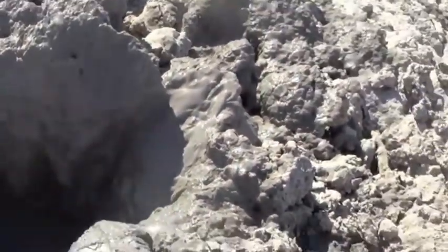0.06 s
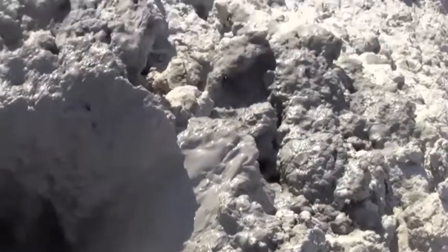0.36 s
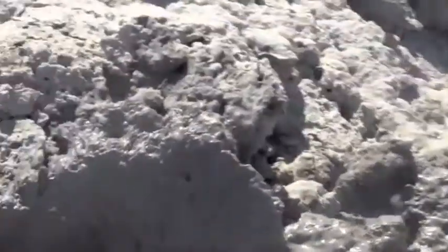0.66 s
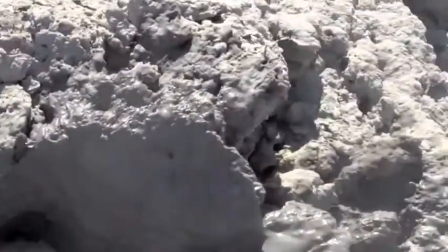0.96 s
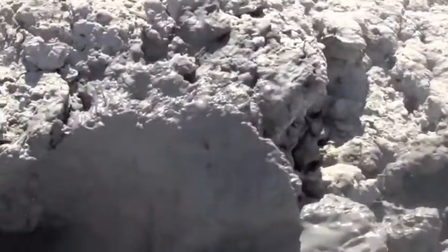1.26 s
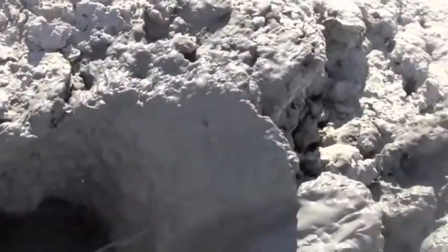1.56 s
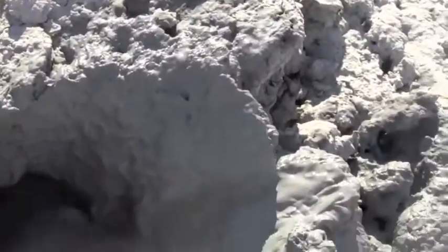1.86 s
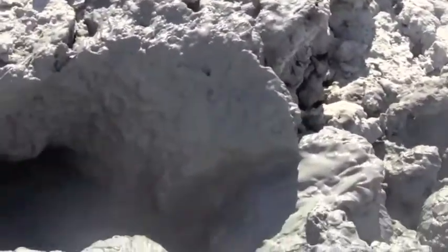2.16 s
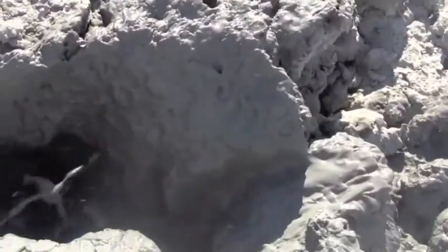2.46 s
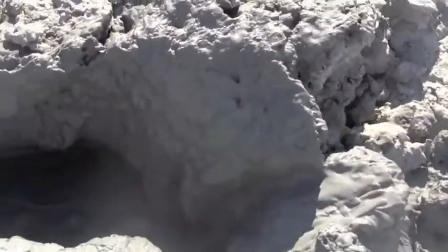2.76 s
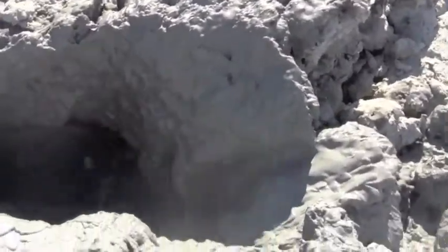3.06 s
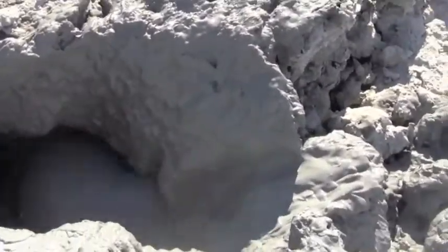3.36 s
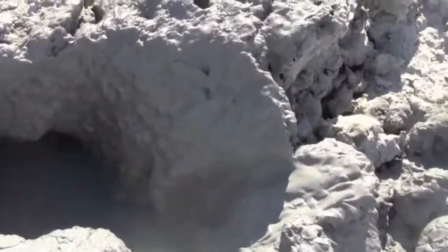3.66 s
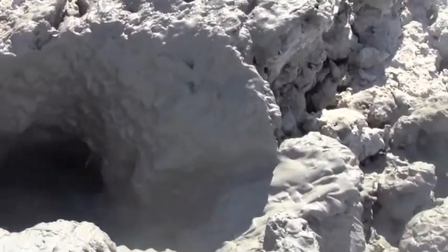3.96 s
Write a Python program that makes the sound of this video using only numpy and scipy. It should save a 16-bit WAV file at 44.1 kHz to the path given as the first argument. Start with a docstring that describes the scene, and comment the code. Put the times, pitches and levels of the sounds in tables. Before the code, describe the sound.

Mud bubbles pop and splatter in uneven bursts with short lulls, close to the microphone at the edge of an open-air vent. Soft churning, dull gulps and brief sputters of gas run between them, with very light wind behind.

```python
"""Boiling mud crater.

Thick mud boils outdoors, heard from the rim. Gas bubbles break in irregular bursts: each cavity rings
briefly and rises in pitch as it opens, its skin tears with a wet splat, and escaping gas sprays fine
droplets. Deeper down the mud gulps and churns. The walls add a very short ring; light wind hisses."""
import sys
import numpy as np
from scipy import signal
from scipy.fft import rfft, irfft
from scipy.io import wavfile

SR = 44100
rng = np.random.default_rng(int(sys.argv[2]) if len(sys.argv) > 2 else 0)


def bounce(signal):
    """Save signal as a 16-bit WAV file at the path given by the first command-line argument."""
    frames = np.transpose(np.atleast_2d(signal))
    limited = np.clip(frames, -1, 1)
    pcm = np.round(limited * 32767).astype(np.int16)
    wavfile.write(sys.argv[1], SR, pcm)


N = 176400


def undb(db):
    """Decibels to gain."""
    return 10 ** (np.asarray(db) / 20)


def unit(x):
    """Scale to rms 1."""
    return x / np.sqrt(np.mean(x ** 2))


def add(out, start_s, x):
    """Mix x into out at start_s."""
    i = max(int(start_s * SR), 0)
    out[i:i + len(x)] += x[:max(len(out) - i, 0)]


def curve(rows):
    """Gain over time from (time [s], level [dB]) rows."""
    return undb(np.interp(np.arange(N) / SR, *np.array(rows).T))


def at_hz(rows, hz):
    """Interpolate (frequency [Hz], value) rows on a log axis."""
    row_hz, values = np.array(rows).T
    return np.interp(np.log(hz + 1), np.log(row_hz), values)


def colour(x, rows, share=1):
    """Filter by (frequency [Hz], gain [dB]) rows; share scales the dB."""
    gain_db = share * at_hz(rows, np.fft.rfftfreq(len(x), 1 / SR))
    return irfft(rfft(x) * undb(gain_db), len(x))


def band(x, lo_hz, hi_hz):
    """Band-pass; rms 1."""
    sos = signal.butter(2, [lo_hz, hi_hz], "band", fs=SR, output="sos")
    return unit(signal.sosfilt(sos, x))


def walk(rate_hz, size=N):
    """Smooth random drift; spread near 1."""
    position = np.arange(size) / SR * rate_hz
    knots = int(position[-1]) + 2
    return np.interp(position, np.arange(knots), rng.standard_normal(knots))


def cavity(hz, decay_s, rise_per_s, wobble=0, size=SR // 6):
    """A gas pocket swells, rings with rising pitch and collapses; peak near 1."""
    open_decays, collapse_decays, overtone_db = 0.26, 14, -22
    t = np.arange(size) / SR
    age = t / decay_s
    env = (1 - np.exp(-age / open_decays)) * np.exp(-age - (age / collapse_decays) ** 4)
    env /= env.max()
    phase = 2 * np.pi * np.cumsum(hz * (1 + rise_per_s * t) * (1 + wobble)) / SR
    return env * (np.sin(phase) + undb(overtone_db) * env * np.sin(2 * phase))


def droplets(spread_db, per_s=2600, decay_cycles=2.5, pool=12000):
    """Dense crackle of tiny bursting pockets; rms 1."""
    out, t = np.zeros(N), np.arange(SR // 200) / SR
    for when, pitch, size in rng.random((pool, 3))[:int(per_s * N / SR)]:
        hz = 1000 * 14 ** pitch
        strength = undb(-spread_db * np.log(max(size, .02))) * np.sqrt(hz)
        env = np.exp(-t * hz / decay_cycles) * (1 - t / t[-1])
        add(out, when * N / SR, strength * env * np.sin(2 * np.pi * hz * t))
    return unit(out)


# Wind spectrum (frequency [Hz], relative density [dB])
WIND_SPECTRUM = [(30, -16), (112, -12), (410, 3), (1150, -6), (2850, -11), (11000, -21), (15000, -32)]
# Wind strength (time [s], level [dB])
WIND_LEVEL = [(0, -43), (.5, -51.5), (2.6, -46), (4, -53)]


def wind(gust_db=1.0, gust_hz=6.4):
    """Light air over open ground."""
    hiss = unit(colour(rng.standard_normal(N), WIND_SPECTRUM))
    return hiss * curve(WIND_LEVEL) * undb(gust_db * walk(gust_hz))


# Pocket strength (pitch [Hz], relative level [dB])
CHURN_SPECTRUM = [(70, -8), (130, 2.5), (200, 3), (400, -1.5), (800, -6.5), (2400, -12.5)]
# Churn strength (time [s], level [dB])
CHURN_LEVEL = [(0, -52), (.42, -49.5), (.68, -43.5), (.85, -56), (.95, -35.5), (1.12, -46), (1.52, -37),
               (1.95, -40), (2.3, -37.5), (2.58, -56), (2.74, -45), (2.82, -47.5), (2.98, -37.5),
               (3.27, -41.5), (3.72, -40), (3.92, -29.5), (4, -35)]


def churn(per_s=330, spread_db=4.0, max_rise_per_s=18, pool=2500):
    """Many small soft pockets turn over inside the vent."""
    out = np.zeros(N)
    for when, pitch, size, length in rng.random((pool, 4))[:int(per_s * N / SR)]:
        hz = 90 * 32 ** pitch
        decay_s = 1.4 * (0.82 + length) / np.sqrt(hz * 400)
        db = at_hz(CHURN_SPECTRUM, hz) - spread_db * np.log(max(size, .04))
        ring = cavity(hz, decay_s, max_rise_per_s * length, size=SR // 16)
        add(out, when * N / SR, undb(db) * ring)
    return unit(out) * curve(CHURN_LEVEL)


def specks(per_s=22, decay_s=0.0029, pool=400):
    """Specks of mud tick on the crater walls, harder when the vent churns."""
    env, t = np.zeros(N), np.arange(SR // 100) / SR
    for when, size in rng.random((pool, 2))[:int(per_s * N / SR)]:
        add(env, when * N / SR, size ** 2 * np.exp(-t / decay_s))
    grit = colour(band(rng.standard_normal(N), 920, 14000), [(1500, 16.5), (10000, -5)])
    return curve(CHURN_LEVEL) * env * grit


# Skin tears (time [s], low band [dB], mid band [dB], high band [dB], decay [ms])
SKIN_TEARS = [(0.019, -22, -32, -31, 2.35), (0.542, -22, -36, -33, 5.8), (.565, -14.5, -37, -23.5, 3.8),
              (.675, -38, -28, -31, 2.7), (0.803, -26.5, -27.5, -29.5, 5), (0.824, -14, -12.5, -17.5, 2.2),
              (0.973, -48, -35, -30.5, 1.2), (1.188, -24.5, -23.5, -26.5, 5.4),
              (1.251, -19.5, -25.5, -22, 5.3), (1.264, -17.5, -19.5, -18.5, 2.8),
              (1.315, -52, -19, -13, 0.56), (1.335, -20, -31, -28.5, 5.4), (1.415, -28.5, -30, -33.5, 3.3),
              (1.489, -40, -19, -26, 10.2), (1.525, -17.5, -21, -25, 5.5), (1.647, -25.5, -24.5, -20, 3.6),
              (1.729, -23.5, -24.5, -25, 3.2), (2.141, -30.5, -34, -33.5, 9.3),
              (2.191, -22, -37, -37.5, 4.3), (2.285, -19, -23.5, -29, 8.9), (2.35, -19, -21.5, -24.5, 5.5),
              (2.408, -24.5, -29, -46, 0.76), (2.472, -17, -15, -19.5, 4.6), (2.555, -24.5, -44, -42, 1.4),
              (2.715, -34, -36.5, -42, 7.8), (3.005, -31, -16, -22.5, 6.9), (3.119, -33.5, -31.5, -25, 3.1),
              (3.175, -27.5, -23, -27.5, 3.7), (3.620, -30, -40, -45, 2.2), (3.786, -34, -34.5, -27, 1.2),
              (3.884, -25.5, -39, -38, 18), (3.913, -15.5, -17.5, -25, 7), (3.976, -22, -41, -38.5, 9.6)]


def splats(attack_ms=1.4, lead_s=.02, stretch_db=-18.5):
    """Mud skin crackles faintly as it stretches, then tears with a sharp burst in three bands."""
    out, t = np.zeros(N), np.arange(SR // 10) / SR
    crackle = droplets(spread_db=2.5) + undb(6.5) * rng.standard_normal(N)
    bands = np.array([band(crackle, *hz) for hz in [(557, 2280), (2610, 5000), (6360, 12060)]])
    for start_s, *bands_db, decay_ms in SKIN_TEARS:
        tear = (1 - np.exp(-(t / attack_ms * 1000) ** 2)) * np.exp(-t / decay_ms * 1000)
        stretch = undb(stretch_db) * tear.max() * np.exp(-np.abs(t - lead_s) / decay_ms * 1000)
        env = np.hypot(np.interp(t - lead_s, t, tear), stretch)
        grit = bands.take(int(start_s * SR) + np.arange(len(t)), axis=1, mode="wrap") * env
        # Each band gets the energy of the envelope at peak 1.
        grit *= np.sqrt(np.sum(env ** 2) / np.sum(grit ** 2, axis=1, keepdims=True)) / env.max()
        add(out, start_s - lead_s, undb(bands_db) @ grit)
    return out


# Pockets bursting at once (time [s], start pitch [Hz], level [dB])
BLUNT_POPS = [(.020, 288, -19), (.020, 774, -16.5), (.186, 3070, -35.5), (0.526, 1840, -14.5),
              (0.564, 385, -9.5), (.805, 1350, -15.5), (0.822, 1204, -13.5), (0.976, 1570, -27),
              (.824, 395, -13), (.824, 570, -9), (1.194, 2810, -16.5), (1.266, 460, -16),
              (1.337, 1100, -12), (1.583, 870, -17), (1.729, 620, -18), (2.350, 830, -8.5),
              (2.359, 1950, -16.5), (3.006, 698, -5.5), (3.007, 1990, -13.5), (3.192, 1190, -24),
              (3.519, 1706, -23.5), (3.886, 454, -14.5), (3.912, 616, -4.5), (3.931, 387, -10.5)]
# Necks of gas closing quickly (time [s], start pitch [Hz], level [dB])
WET_SQUELCHES = [(.132, 630, -33), (1.183, 465, -24.5), (1.240, 1140, -26), (1.681, 443, -25),
                 (1.691, 758, -22.5), (1.702, 1400, -31), (1.709, 1745, -22.5), (1.711, 1040, -28),
                 (1.746, 985, -29.5), (1.756, 1400, -26.5), (2.965, 1348, -18), (2.986, 1870, -27),
                 (3.052, 803, -29), (3.142, 1104, -35), (3.167, 1464, -32.5), (3.193, 2050, -26.5),
                 (3.206, 1030, -23.5), (3.968, 1340, -19.5)]
# Cavities opening (time [s], start pitch [Hz], level [dB], decay [ms], rise [start pitches/s])
PLOPS = [(.253, 192, -32, 13.4, 27), (.514, 1533, -25, 11, 9.3), (.566, 1513, -10.5, 5.2, 16.4),
         (.566, 662, -11, 6, 13), (.824, 1790, -22, 9.3, 5.5), (1.020, 212.6, -28.5, 16.3, 17.8),
         (1.025, 1333, -29.5, 26, 6.1), (1.226, 495, -10.5, 4.1, 4.9), (1.233, 650, -15.5, 9.8, 26),
         (1.262, 739, -11.5, 8.7, 9.3), (1.315, 1160, -19, 9, 7.5), (1.341, 820, -14, 7.8, 13.3),
         (1.340, 1595, -15, 8.2, 1.1), (1.529, 566, -7, 3.9, 28), (1.549, 470, -14.5, 4.6, 52),
         (1.729, 2516, -31, 8, 1.5), (2.128, 379, -10.5, 8, 14.7), (2.196, 890, -28, 11, 8),
         (2.347, 340, -14, 5.4, 5.2), (2.360, 913, -13, 5, 3.3), (2.364, 1540, -24, 12, 0.93),
         (2.424, 185, -24.5, 13.4, 42), (2.471, 1726, -14, 5.6, 7.1), (2.473, 667, -16, 8.1, 11),
         (2.476, 2350, -16.5, 4, 1.7), (2.491, 335, -25.5, 10.3, 15.7), (3.004, 296, -15.5, 12, 1.55),
         (3.005, 1295, -15, 5, 7.1), (3.795, 394, -24, 13, 13), (3.847, 990, -20, 3.6, 15),
         (3.868, 637, -20.5, 10.5, 3.3), (3.920, 1780, -15.5, 4.9, 11.4), (3.990, 387, -21, 7, 18)]


def bubbles(drag_db=2.3, wobble_depth=0.027):
    """Pops, squelches and plops ring at the surface; soft, sticky walls roughen pitch and level."""
    pop_decay_ms, pop_rise_per_s = 2.4, 9.9
    squelch_decay_ms, squelch_rise_per_s = 4.9, 28.1
    pops = [(*row, pop_decay_ms, pop_rise_per_s) for row in BLUNT_POPS]
    squelches = [(*row, squelch_decay_ms, squelch_rise_per_s) for row in WET_SQUELCHES]
    out = np.zeros(N)
    for start_s, hz, db, decay_ms, rise_per_s in list(PLOPS) + pops + squelches:
        drag = undb(drag_db * walk(hz / 2, size=SR // 6))
        wobble = wobble_depth * walk(388, size=SR // 6)
        add(out, start_s, undb(db) * drag * cavity(hz, decay_ms / 1000, rise_per_s, wobble))
    return out


# Gas sputters (time [s], length [s], low band [dB], high band [dB])
SPUTTERS = [(0.494, 0.048, -37, -44.5), (0.702, 0.074, -43, -52), (1.011, 0.12, -44.5, -49),
            (1.164, 0.12, -38, -43), (1.481, 0.06, -30.5, -30.5), (1.528, 0.16, -39.5, -47),
            (1.693, 0.047, -30.5, -31.5), (1.783, 0.14, -42.5, -49.5), (2.165, 0.18, -41.5, -50),
            (2.91, 0.05, -36.5, -46), (2.955, 0.074, -29.5, -33.5), (3.133, 0.11, -44.5, -45.5),
            (3.289, 0.029, -39, -71), (3.569, 0.042, -38.5, -51), (3.803, 0.28, -41, -48),
            (3.854, 0.1, -37, -41.5)]


def sprays(simmer_db=-67, flutter_db=2, edge_s=0.0083):
    """Sputtering gas throws droplets in gusts over a faint steady simmer."""
    t = np.arange(N) / SR
    fizz = droplets(spread_db=4.3) * undb(flutter_db * walk(130))
    gains = np.full((2, N), undb(simmer_db))
    for start_s, length_s, *bands_db in SPUTTERS:
        opening = np.clip((t - start_s) / edge_s, 0, 1)
        closing = np.clip((start_s + length_s - t) / edge_s / 2 + .5, 0, 1)
        gains += undb(bands_db)[:, None] * opening * closing
    return gains[0] * band(fizz, 990, 4370) + gains[1] * band(fizz, 6900, 13300)


# Pockets deep in the vent (time [s], start pitch [Hz], level [dB])
DEEP_GULPS = [(0.561, 166, -27), (0.684, 157, -29.5), (0.82, 174, -34.5), (1.406, 175, -22),
              (1.5, 227, -17.5), (1.523, 213, -19), (1.84, 224, -25), (1.97, 190, -16), (2.018, 203, -26),
              (2.083, 167, -19.5), (2.159, 210, -17), (2.311, 162, -17), (2.711, 166, -19.5),
              (2.729, 238, -16), (3.354, 169, -18.5), (3.585, 199, -17.5)]


def gulps(decay_s=0.00587, rise_per_s=8.6, slop_db=-16.5, slop_band_hz=(204, 496.128)):
    """Large pockets ring dully; mud slops back after each."""
    out, t = np.zeros(N), np.arange(SR // 6) / SR
    age = t / decay_s
    slop_env = age / 2 * np.exp(1 - age / 2)
    for start_s, hz, db in DEEP_GULPS:
        slop = band(rng.standard_normal(len(t)), *slop_band_hz) * slop_env
        add(out, start_s, undb(db) * (cavity(hz, decay_s, rise_per_s) + undb(slop_db) * slop))
    return out


# Stretched mud films (time [s], pitch [Hz], level [dB])
MUD_FILMS = [(.990, 1170, -39.5), (1.000, 3030, -45.5), (1.012, 2260, -45.5), (1.450, 1210, -41),
             (1.725, 867, -33), (3.770, 1460, -34), (3.775, 1074, -36.5)]


def films(length_s=0.067, pitch_arch=.05):
    """A film swells and slackens; its thin tone follows in level and pitch."""
    out = np.zeros(N)
    swell = np.sin(np.pi * np.arange(int(length_s * SR)) / (length_s * SR))
    for start_s, hz, db in MUD_FILMS:
        drift = .5 * walk(2 / length_s, size=len(swell))
        pitch_hz = hz * (1 + pitch_arch * (swell - 1 + drift))
        add(out, start_s, undb(db) * swell ** 2 * np.sin(2 * np.pi * np.cumsum(pitch_hz) / SR))
    return out


def echo(x, t60_s, delay_s=.002):
    """Diffuse reflections: a delayed noise tail of unit energy."""
    t = np.arange(SR // 2) / SR
    tail = rng.standard_normal(len(t)) * np.exp(-np.log(1000) * t / t60_s) * (t > delay_s)
    return signal.fftconvolve(x, tail / np.linalg.norm(tail))[:N]


# Vent response, applied to all mud sounds (frequency [Hz], gain [dB])
VENT_RESPONSE = [(170, -2.5), (305, 3), (480, 2.5), (1900, 1.5), (2600, 2), (4800, -2), (7500, 4.5),
                 (10500, -4)]


def scene():
    """Vent straight ahead; treble scatters unevenly left and right; air brushes the microphone ports."""
    mud = bubbles() + gulps() + splats() + sprays() + churn() + films() + specks()
    mud = colour(mud, VENT_RESPONSE)
    crater = undb(-8) * colour(echo(mud, t60_s=0.021), [(600, -2.5), (2000, -0.5)])
    ground = undb(-17.5) * echo(mud, t60_s=0.14)
    mid = mud + crater + ground + wind()
    scatter = echo(mid, t60_s=0.004)
    scatter = colour(scatter, [(200, -31.5), (700, -29.5), (2500, -8.5), (8000, -2), (12000, 10)])
    flicker = unit(walk(250))
    port_air = undb(-63) * band(rng.standard_normal(N), 100, 400)
    side = undb(-10.5) * scatter * flicker + port_air
    return np.array([mid + side, mid - side])


# Microphone port imbalance (frequency [Hz], left minus right [dB])
PORT_IMBALANCE = [(4000, 0), (6500, 0), (8200, 1), (9800, -10), (11500, 4), (15000, -1.5)]


def record(dry):
    """Each port colours the treble its own way; the bass thins, peaks round off, the top is cut."""
    low_cut_hz, top_hz, ceiling = 75, 15800, 0.82
    ports = np.array([colour(x, PORT_IMBALANCE, share) for x, share in zip(dry, (.5, -.5))])
    ports = signal.sosfilt(signal.butter(2, low_cut_hz, "high", fs=SR, output="sos"), ports)
    ports = ports / (1 + (ports / ceiling) ** 8) ** (1 / 8)
    return signal.sosfilt(signal.ellip(8, .2, 80, top_hz, fs=SR, output="sos"), ports)


dry = scene()
out = record(dry)
bounce(out)
```